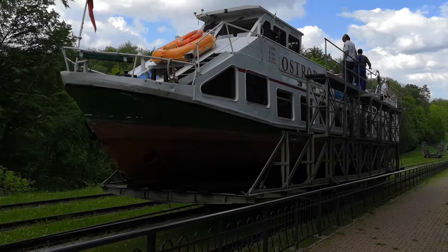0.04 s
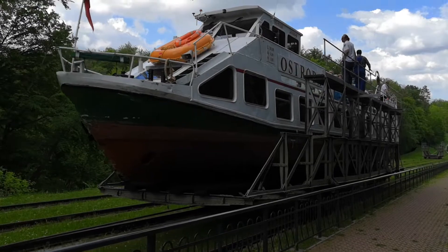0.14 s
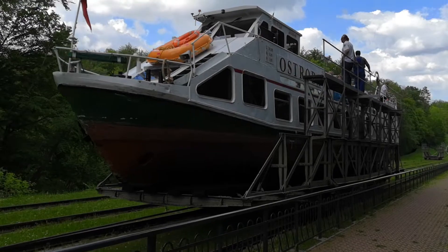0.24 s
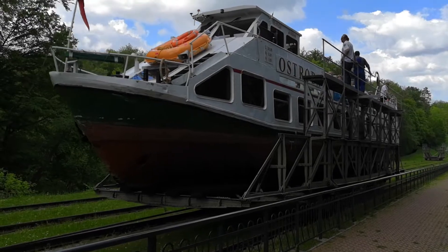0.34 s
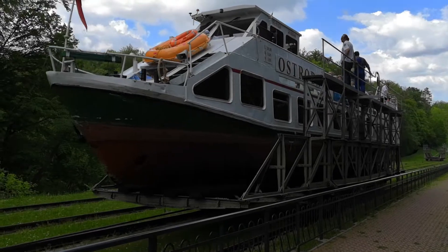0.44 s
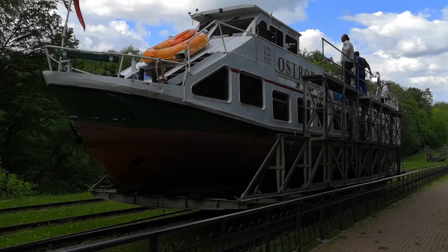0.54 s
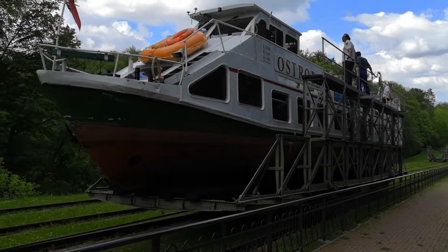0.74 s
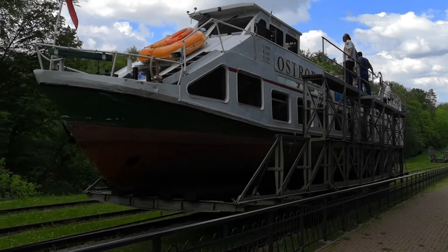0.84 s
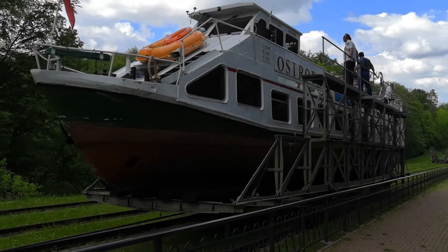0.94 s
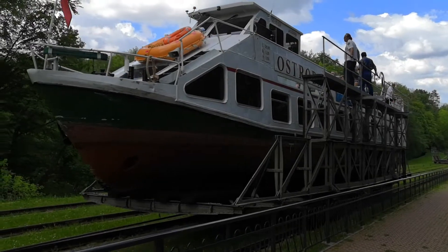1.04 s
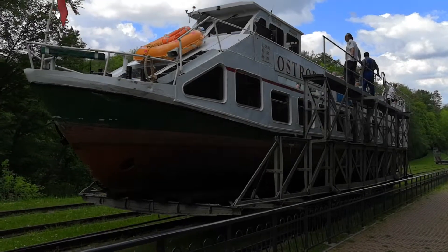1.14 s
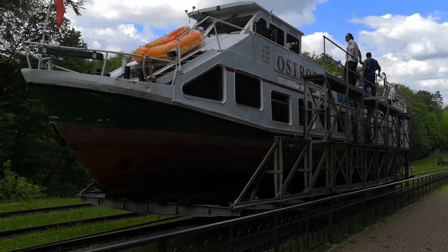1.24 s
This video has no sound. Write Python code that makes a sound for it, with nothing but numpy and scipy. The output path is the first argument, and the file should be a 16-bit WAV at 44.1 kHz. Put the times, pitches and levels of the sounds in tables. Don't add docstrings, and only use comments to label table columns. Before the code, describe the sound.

A heavy steel carriage on rails clanks hard in a rapid burst of hollow blows, then shudders, grinds and squeals briefly as small parts tap; quiet outdoor hiss and one bird chirp follow, in close wide stereo.

```python
import sys
import numpy as np
from scipy import signal
from scipy.fft import rfft, irfft, next_fast_len
from scipy.io import wavfile
from scipy.ndimage import map_coordinates

SR = 44100
rng = np.random.default_rng(int(sys.argv[2]) if len(sys.argv) > 2 else 0)


def output_pcm(signal):
    pcm = np.clip(np.atleast_2d(signal).T, -1, 1) * 32767
    wavfile.write(sys.argv[1], SR, np.round(pcm).astype(np.int16))


def invert_db(level):
    return 10 ** (np.asarray(level, dtype=float) / 20)


N = 57330
SECONDS = np.arange(N) / SR


def unit(x):
    return x / np.sqrt(np.mean(x ** 2) + 1e-20)


def along(points, hz):
    f, v = np.transpose(points)
    return np.interp(np.log(hz + 1), np.log(f + 1), v)


def level_at(points, outside_db=None):
    return np.interp(SECONDS, *np.transpose(points), outside_db, outside_db)


def wobble(rate):
    knots = rng.standard_normal(int(N * rate / SR) + 4)
    return map_coordinates(knots, [np.arange(N) * rate / SR])


def filtered(x, response):
    m = next_fast_len(N + SR // 2)
    return irfft(rfft(x, m) * response(np.fft.rfftfreq(m, 1 / SR)), m)[..., :N]


def noise(spectrum):
    return unit(filtered(rng.standard_normal((2, N)), lambda hz: invert_db(along(spectrum, hz))))


def dying(t60_of, spectrum):
    hz, t, z = signal.stft(rng.standard_normal((2, N)), SR, nperseg=512, noverlap=448)
    gain = invert_db(along(spectrum, hz))[:, None]
    fall = invert_db(-60 * t / along(t60_of, hz)[:, None]) / np.sqrt(np.mean(gain ** 2))
    return signal.istft(z * gain * fall, SR, nperseg=512, noverlap=448)[1][:, :N]


def add(bus, s, sound):
    i = round(s * SR)
    bus[:, i:] += sound[:, :N - i]


def rise(rise_s):
    return 1 - np.exp(-SECONDS / rise_s)


def ring(hz, t60, rise_s):
    hz, t60 = np.reshape(hz, (-1, 1)), np.reshape(t60, (-1, 1))
    turn = rng.uniform(0, 2 * np.pi, (2, len(hz), 1)) * [[[0]], [[1]]]
    return np.sin(2 * np.pi * hz * SECONDS + turn) * invert_db(-60 * SECONDS / t60) * rise(rise_s)


def tap(db, hz, t60, rise_s):
    wave = np.sin(2 * np.pi * hz * SECONDS + [[0], [2.5]])
    return invert_db(db - 60 * SECONDS / t60) * rise(rise_s) * wave


# (pitch [Hz], level [dB per Hz])
AIR = [(180, -1), (300, -3.5), (684, -12.5), (952, -7), (1100, -13), (1260, -9.5), (2830, -11),
       (4130, -20.5), (15500, -40.5)]
# (pitch [Hz], level [dB per Hz])
RUMBLE = [(13, -44), (22, -24), (42, 1.5), (65, -6), (131, -8), (152, -13.5), (400, -36), (520, -62),
          (880, -120)]
# (time [s], level [dB])
ROLL = [(0, -48.5), (.07, -50.5), (.1, -56.5), (.3, -43), (.48, -38), (.53, -53.5), (.75, -53.5), (.8, -56),
        (.95, -55.5), (1.02, -52), (1.13, -54.5), (1.17, -58.5), (1.3, -55)]


def murmur():
    hiss = invert_db(-63 + 0.42 * wobble(2.7)) * noise(AIR)
    rumble = invert_db(level_at(ROLL) + 1.3 * wobble(14.5)) * noise(RUMBLE)
    return hiss + rumble


# (time [s], peak level [dB], pitch [Hz], time to fall 60 dB [s], spread [octaves])
KNOCKS = [(.345, -30, 2402, 0.04, 0.75), (.397, -43.5, 2550, 0.072, 0.19), (.449, -40.5, 2900, 0.028, 0.39),
          (.492, -41, 2050, 0.038, 0.46), (0.575, -66, 5700, 0.2, 0.14), (0.59, -46.5, 2415, 0.27, 0.4),
          (0.01, -54.5, 2800, 0.06, 0.42), (0.712, -57.5, 1700, 0.12, 0.25), (.8, -63, 2100, 0.15, 0.44),
          (1.001, -59, 1978, 0.17, 0.73), (.699, -56, 1123, 0.15, 0.34)]
# (pitch [Hz], level [dB per Hz])
SCRAPE = [(400, -26), (750, -3.5), (1450, -6.5), (2800, -6.5), (4000, -16), (7800, -19), (10300, -32.5),
          (11200, -43.5), (15500, -48)]


def knocks():
    out = np.zeros((2, N))
    for s, db, hz, t60, octaves in KNOCKS:
        spread = np.linspace(-1, 1, 13) + .06 * rng.standard_normal(13)
        gains = invert_db(-9 * spread[:, None] ** 2) * rng.standard_normal((13, 1))
        cluster = (gains * ring(hz * 2 ** (octaves * spread), [t60] * 13, 0.00045)).sum(axis=1)
        crack_level = invert_db(-6.5 - 60 * SECONDS / 0.064) * np.minimum(SECONDS / 0.0056, 1)
        add(out, s, invert_db(db) * (0.32 * cluster + crack_level * noise(SCRAPE)))
    return out


# (time [s], level [dB], pitch [Hz])
THUDS = [(0.032, -35, 63.5), (0.344, -22, 50.3), (0.358, -38.5, 86.5), (.392, -23, 109), (0.432, -36, 60),
         (0.476, -42, 118), (0.453, -52, 111), (0.536, -34.5, 249), (0.591, -48, 170), (0.713, -45, 55.5),
         (0.993, -36, 102), (1.03, -59, 65), (1.125, -49, 79)]


def thuds():
    out = np.zeros((2, N))
    for s, db, pitch_hz in THUDS:
        modes = ring(pitch_hz * np.array([.8, 1.05, 1.4]), [0.1] * 3, 0.0041)
        add(out, s, invert_db(db - 11) * modes.sum(axis=1))
    return out


# (time [s], peak level [dB], extra level of the deep rings [dB])
BLOWS = [
    (.222, -28.5, -4),
    (0.2287, -16, 6),
    (.237, -16.5, -6.5),
    (.252, -18, -9),
    (0.264, -25.5, 16),
    (.286, -29, -19),
    (.299, -23.5, -1.5),
]
# (pitch [Hz], level [dB], time to fall 60 dB [s])
FRAME = [(99.5, -19, 0.93), (125, -16, 0.15), (232, -16, 0.15), (317, -7, 0.07), (426, -7.5, 0.093),
         (510, -20, 0.3), (633, -40, 0.17), (839, -12.5, 0.22), (976, -28.5, 0.27), (1075, -23, 0.2),
         (1555, -29, 0.3), (2004, -20, 0.14), (2460, -12, 0.078), (2800, -21.5, 0.14)]
# (pitch [Hz], level [dB per Hz])
PLATES = [(24, -14), (40, -6), (218, -8), (622, -14.5), (735, -16.5), (1080, -13), (1370, -20.5),
          (2480, -19.5), (12000, -82.5), (15600, -100), (22000, -120)]
# (pitch [Hz], time to fall 60 dB [s])
PLATE_T60 = [(60, 1), (200, 0.32), (800, 0.15), (3000, 0.22), (10000, 0.82)]


def blows():
    out = np.zeros((2, N))
    hz, level, t60 = np.transpose(FRAME)
    for s, db, deep_db in BLOWS:
        deep = hz < 170
        scatter_db = 1.5 * rng.standard_normal(len(hz))
        gains = invert_db(level + deep_db * deep + scatter_db)[:, None]
        plates = dying(PLATE_T60, PLATES) * rise(0.0043)
        frame = (gains * ring(hz, t60, 0.00043)).sum(axis=1)
        add(out, s, invert_db(db - 11) * (frame + invert_db(-1) * plates))
    return out


# (time [s], peak level [dB], pitch [Hz], time to fall 60 dB [s])
BOOMS = [(.2245, -27, 200, .15), (.229, -18.5, 129.8, .13), (.233, -22.5, 340.5, 0.095),
         (.243, -28.5, 429.3, 0.11), (0.2492, -18.5, 209, .18), (0.255, -30.5, 81.7, 0.21),
         (.275, -30, 190, 0.1), (.2865, -31, 140, .12), (.2965, -20.5, 206, .17), (.329, -35.5, 147, 0.19),
         (.358, -30, 215, .2), (.385, -32, 175, 0.16), (.465, -35, 199.5, 0.17), (.485, -35, 110.4, 0.13)]


def booms():
    out = np.zeros((2, N))
    for s, db, hz, t60 in BOOMS:
        add(out, s, tap(db, hz, t60, 0.0037))
    return out


# (time [s], level [dB])
EFFORT = [(.225, -77), (.25, -60), (.33, -53), (.41, -51), (.5, -53.5), (.55, -62.5), (.6, -61),
          (.68, -72.5), (.8, -79), (.95, -84.5), (1.01, -85), (1.05, -80), (1.09, -100)]


def grind():
    grit = unit(noise(SCRAPE) * invert_db(wobble(300) + 0.35 * wobble(31.4)))
    return invert_db(level_at(EFFORT) + 6) * grit


# (time [s], level [dB])
LOAD = [
    (.24, -78),
    (.3, -38.5),
    (.4, -42),
    (.5, -44),
    (.55, -46),
    (.6, -46.5),
    (.63, -49.5),
    (.655, -58.5),
    (.88, -63),
]
# (pitch [Hz], level [dB per Hz])
GROAN = [(40, -7), (110, -6), (220, 4.5), (280, -3.5), (357, -10.5), (500, -6.5), (690, -20.5), (900, -19),
         (1300, -60)]


def shudder():
    return invert_db(level_at(LOAD, -160) + 0.64 * wobble(27.2)) * noise(GROAN)


# (time [s], level [dB])
PRESS = [
    (.3, -89),
    (.39, -62),
    (.44, -53),
    (.53, -58.5),
    (.56, -59),
    (.6, -57),
    (.67, -68),
    (.8, -75.5),
    (1.15, -94),
]
SQUEAL_HZ = [2080, 2620, 2815, 3000, 4350, 7955, 9170]
# (width [Hz], level [dB], growth with pressure [dB per dB])
SQUEALS = [(80, -8, 0.84), (260, -1, 1.6), (60, -11.5, .5), (200, -8, 2.2), (100, -19, 0.6),
           (80, -16.5, .95), (90, -24.5, .8)]


def squeal():
    out = np.zeros((2, N))
    press_db = level_at(PRESS, -160)
    hardest_db = press_db.max()
    for hz, (width, db, grows) in zip(SQUEAL_HZ, SQUEALS):
        resonance = lambda f: width ** 2 / (width ** 2 + 4 * (f - hz) ** 2)
        line = unit(filtered(rng.standard_normal((2, N)), resonance))
        squeal_db = hardest_db + grows * (press_db - hardest_db) + db
        out += invert_db(squeal_db + 1.3 * wobble(59.3)) * line
    return out


# (time [s], peak level [dB], pitch [Hz], time to fall 60 dB [s])
TAPS = [(.304, -48, 2050, .06), (.3465, -39.5, 2400, 0.034), (.348, -36.5, 1953, 0.053),
        (0.3968, -41, 1707, 0.036), (0.406, -49, 3050, 0.086), (0.417, -37, 2800, 0.043),
        (0.42, -43, 2580, .06), (.4475, -48, 3230, 0.033), (0.453, -51, 2918, 0.15),
        (.4915, -48, 2020, 0.056), (.533, -47.5, 1750, .05), (.572, -46, 2667, 0.057),
        (.59, -48, 2010, 0.037), (.596, -48.5, 2624, .1), (0.6939, -47.5, 1400, 0.027),
        (.695, -48, 1690, 0.013), (0.716, -56, 1710, 0.057), (.803, -59, 1767, .1),
        (0.973, -68.5, 2836, 0.2), (1.01, -62.5, 1630, 0.046), (1.021, -59, 1860, 0.054),
        (1.024, -63, 2126, 0.12), (1.043, -70.5, 3890, 0.065)]


def link_taps():
    out = np.zeros((2, N))
    for s, db, hz, t60 in TAPS:
        add(out, s, tap(db, hz, t60, 0.00059))
    return out


# (time [s], pitch [Hz], level [dB])
CALL = [
    [(1.079, 6600, -86), (1.087, 8000, -64), (1.095, 8350, -60), (1.101, 8150, -59.5), (1.108, 7830, -60),
     (1.117, 8070, -58), (1.126, 7800, -65), (1.133, 7900, -61), (1.139, 7600, -84)],
    [(1.132, 8200, -81), (1.139, 9100, -70), (1.146, 9700, -86), (1.154, 9400, -83), (1.159, 8600, -78),
     (1.163, 7600, -79)],
]


def bird():
    call = 0
    flutter = 1 + 0.4 * np.sin(2 * np.pi * 155 * SECONDS + .6 * wobble(39.7))
    for s, hz, db in map(np.transpose, CALL):
        pitch = np.interp(SECONDS, s, hz) + 60 * wobble(270)
        level = invert_db(np.interp(SECONDS, s, db, -160, -160) + 5.5)
        call = call + flutter * level * np.sin(2 * np.pi * np.cumsum(pitch) / SR)
    trees_t60 = 0.25
    tail = rng.standard_normal((2, SR // 2)) * invert_db(-60 * SECONDS[:SR // 2] / trees_t60)
    echo = signal.fftconvolve(call[None], tail / np.linalg.norm(tail[0]), axes=1)[:, :N]
    return call * invert_db([[-19], [0]]) + invert_db(-6) * echo * invert_db([[-4], [0]])


# (time [s], peak level [dB])
TICKS = [
    (1.2766, -53),
    (1.2804, -48.5),
]
# (pitch [Hz], level [dB])
TICK = [(5000, -36), (6200, -6), (9500, -9), (11500, -24), (15000, -27)]


def ticks():
    out = np.zeros((2, N))
    for s, db in TICKS:
        add(out, s, invert_db(db - 5 - 60 * SECONDS / 0.0039) * noise(TICK))
    return out


# (pitch [Hz], share [0 to 1])
LINKED = [(250, 0.35), (700, 0.15), (3000, 0.22), (12000, 0.13)]
# (pitch [Hz], side over mid [dB])
SIDES = [(60, -30.5), (150, -24), (380, 0), (950, 0), (2380, -0.5), (5980, 1), (15000, -1)]
# (pitch [Hz], left over right [dB])
LEAN = [(60, 1), (240, -2), (950, -4.5), (3770, -5), (15000, -4)]


def scene():
    struck = blows() + booms() + thuds() + knocks() + link_taps() + ticks()
    rubbed = grind() + shudder() + squeal()
    mid, free = struck + rubbed + murmur()
    share = lambda hz: np.clip(along(LINKED, hz), 0, 1)
    tied = filtered(mid, lambda hz: share(hz) * np.exp(0.92j))
    loose = filtered(free, lambda hz: np.sqrt(1 - share(hz) ** 2))
    side = filtered(tied + loose, lambda hz: invert_db(along(SIDES, hz)))
    lean = lambda hz: invert_db(np.outer([.5, -.5], along(LEAN, hz)))
    return filtered(np.array([mid + side, mid - side]), lean) + bird()


def band_limit(x):
    return signal.sosfilt(signal.butter(12, 15610, fs=SR, output="sos"), x)


def record(dry):
    bass_cut = lambda hz: (1j * hz / (30 + 1j * hz)) ** 2
    mix = filtered(dry, lambda hz: bass_cut(hz) * (hz < 15620))
    return band_limit(mix)


dry = scene()
out = record(dry)
output_pcm(out)
```